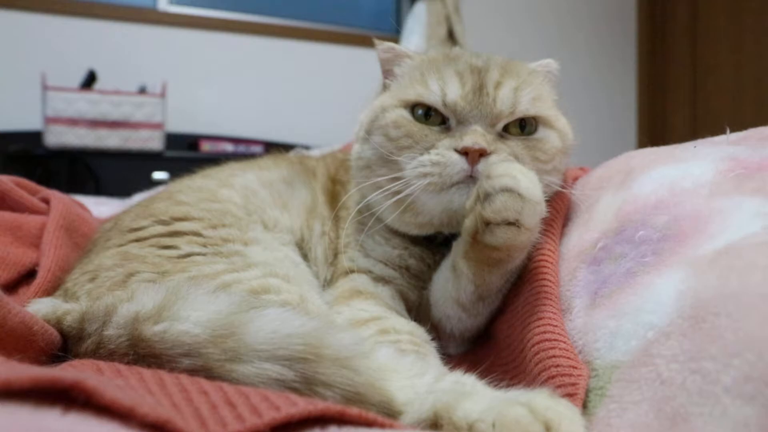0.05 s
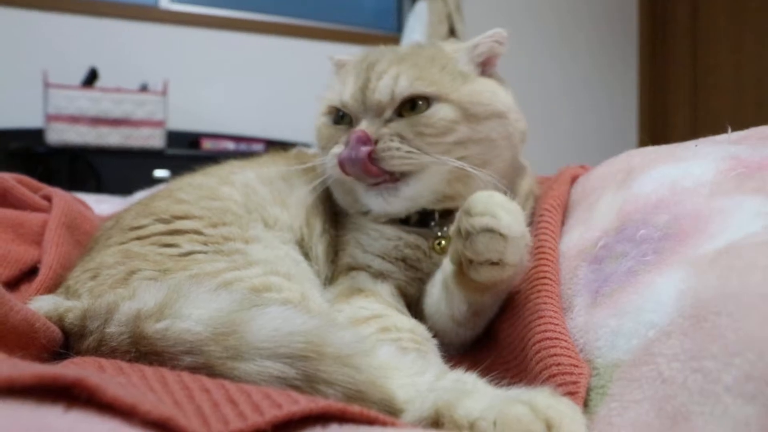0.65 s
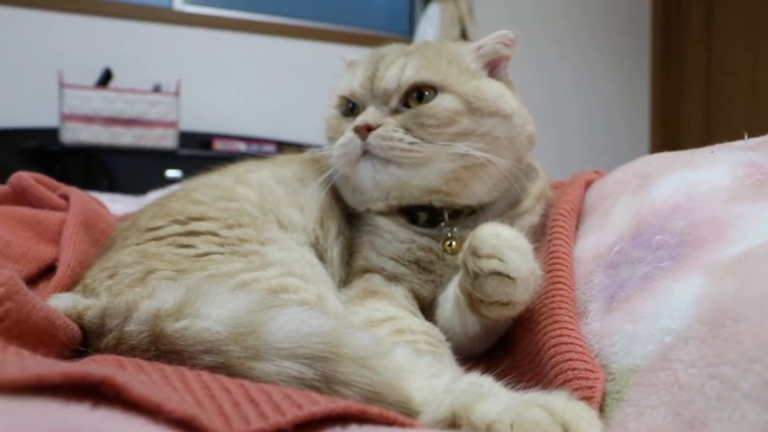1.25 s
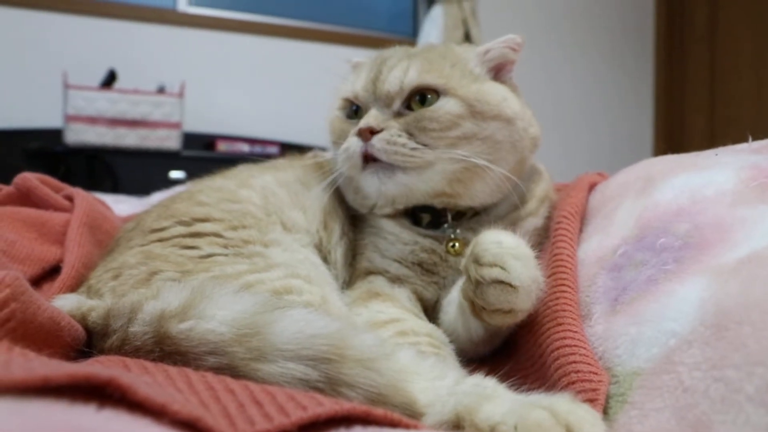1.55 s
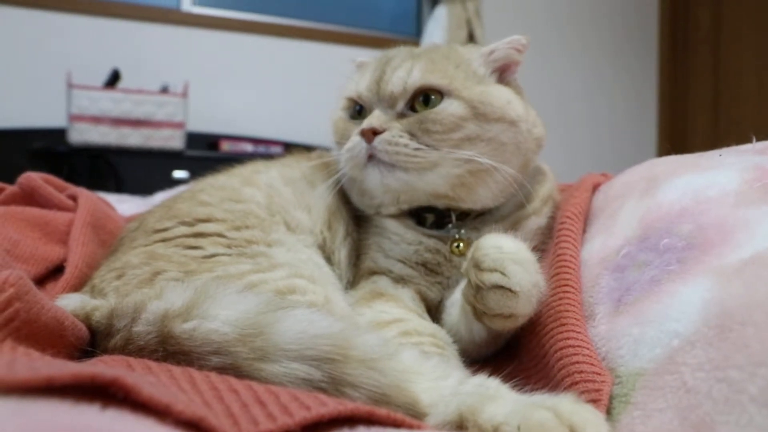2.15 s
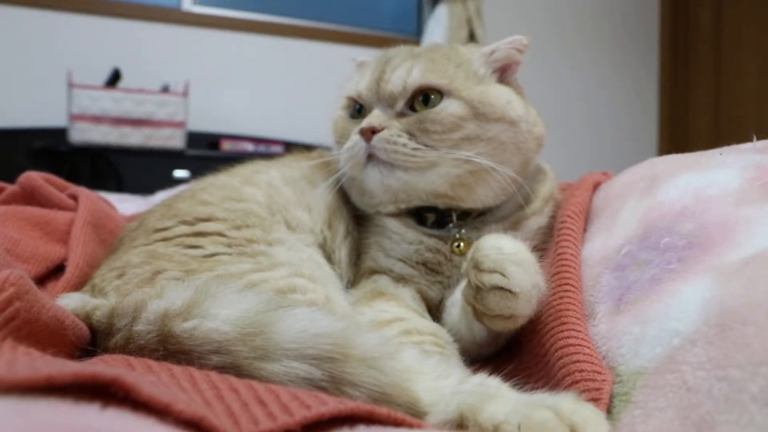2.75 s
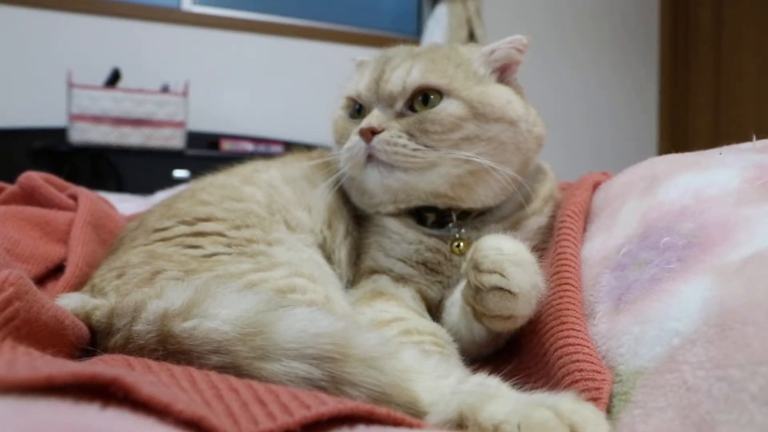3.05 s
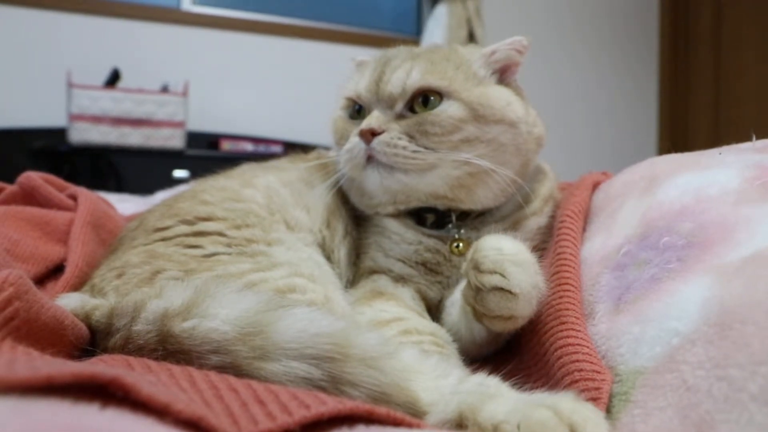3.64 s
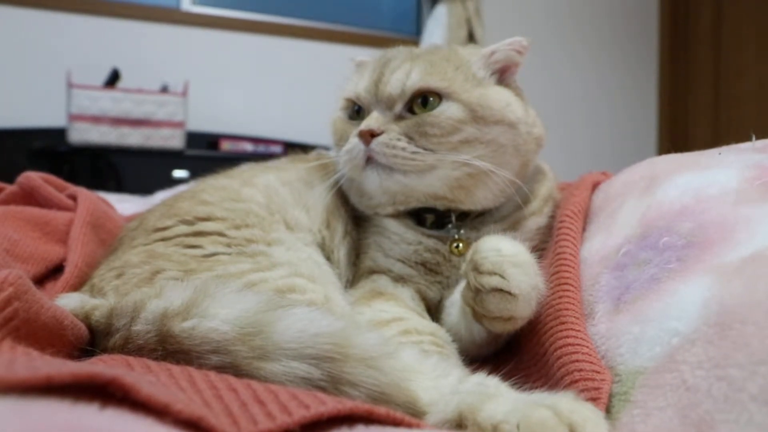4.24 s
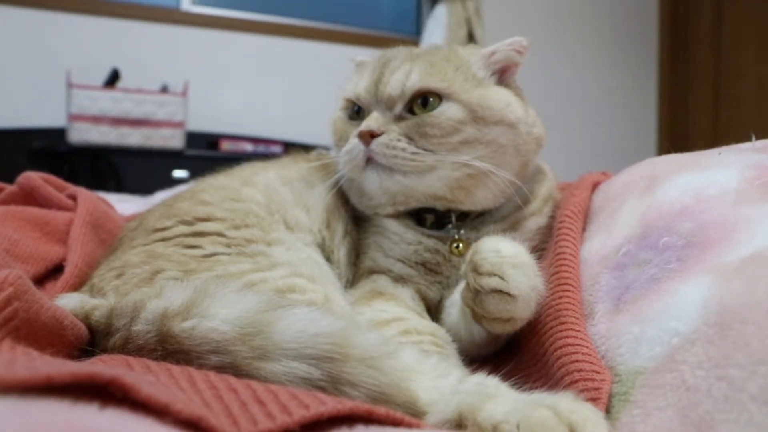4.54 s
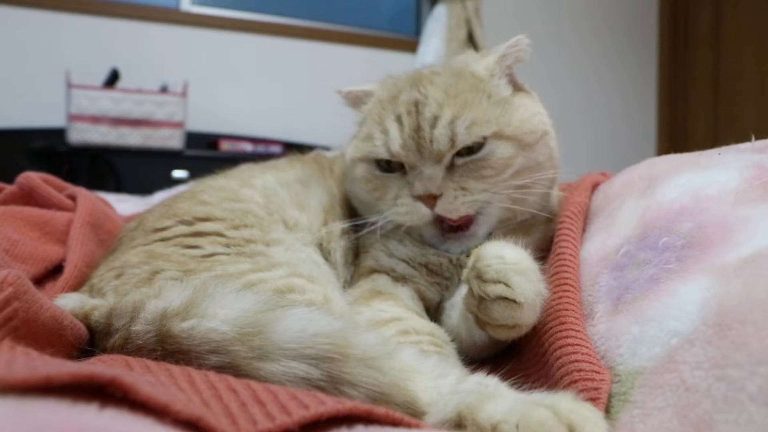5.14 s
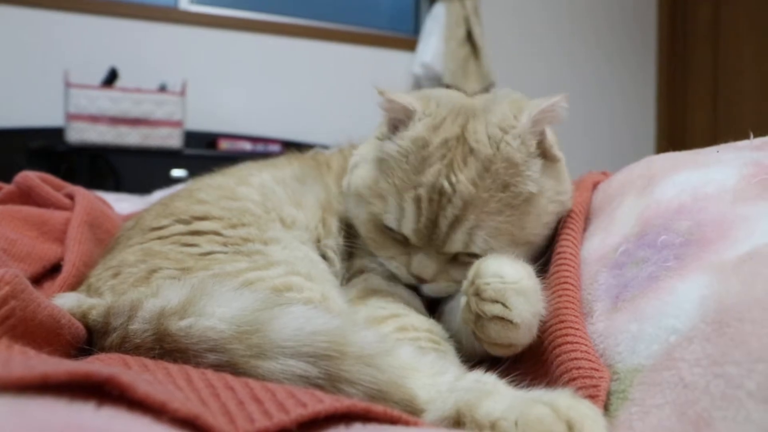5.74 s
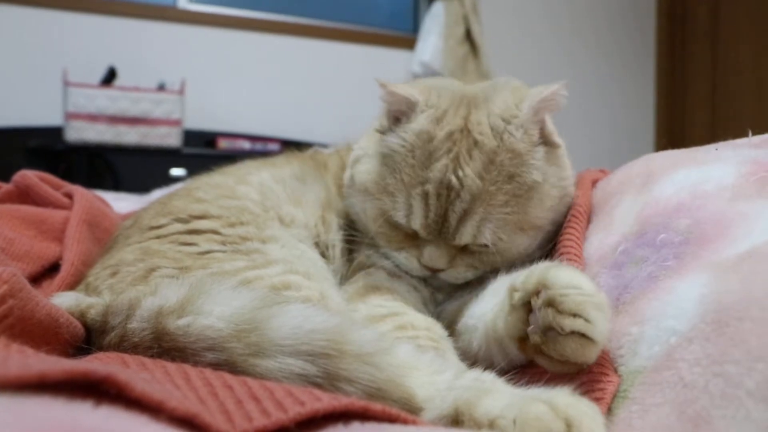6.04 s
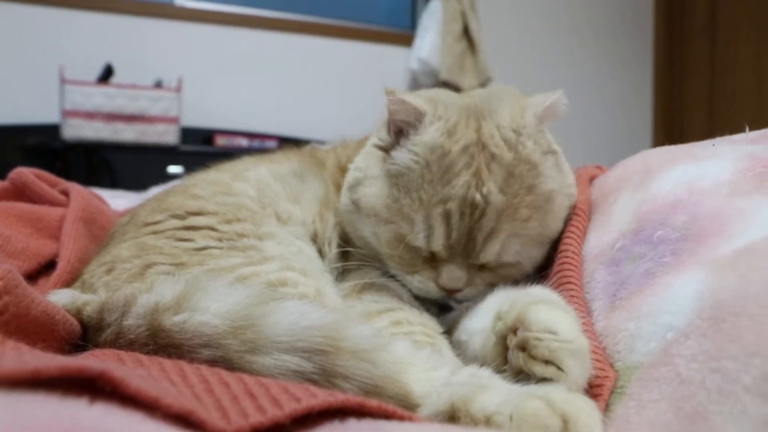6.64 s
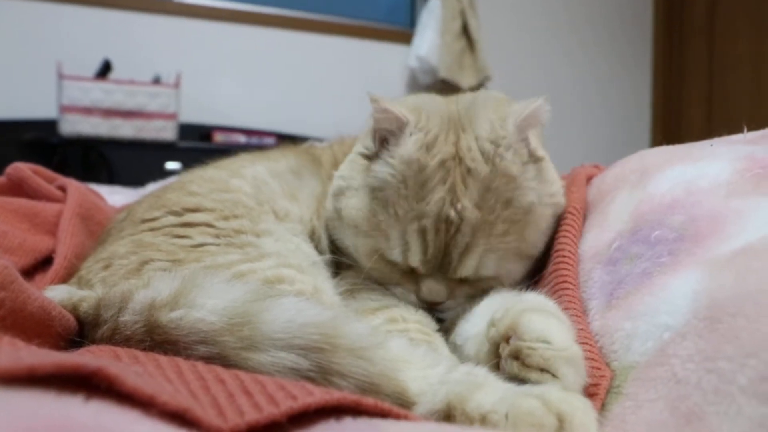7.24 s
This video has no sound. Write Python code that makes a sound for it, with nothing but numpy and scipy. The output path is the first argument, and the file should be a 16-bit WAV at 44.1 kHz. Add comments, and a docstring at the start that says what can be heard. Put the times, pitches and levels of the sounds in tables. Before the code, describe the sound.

A quiet room hums throughout with low, gently pulsing fans that sag slightly in pitch, a soft rush of air, light hiss and a thin, very high whine. Right at the microphone, a camera's focus motor chatters in short bouts of small ticks and scrapes from start to finish. A cat close by makes tiny wet mouth clicks at about 0.6 and 1.1 seconds, then a sharper cluster around 1.6 seconds. Its fur brushes softly on a blanket at about 1.2, 1.8, 3 and 4.5 seconds. Small wet clicks come at 4.7 and 5.3 seconds, the second with one very faint, high ping of a collar bell. Two more clicks follow near 6.1 seconds, then another soft rustle. At about 7.1 seconds the tongue rasps once briefly through fur, with a few wet smacks and a last rustle. Everything stays quiet and close.

```python
"""A cat grooms itself on a blanket in a quiet room, close to a camera with two small microphones.
Saliva snaps in its mouth, fur brushes the blanket, its collar bell rings once and its barbed tongue rasps.
Underneath, two slowly sagging fan rotors hum and beat over mains hum and a soft rush of air.
The camera's focus motor chatters, ringing the lens and body, and its electronics hiss and whine."""
import sys
import numpy as np
from scipy import signal
from scipy.fft import rfft, irfft
from scipy.io import wavfile
from scipy.ndimage import uniform_filter1d

SR = 44100
rng = np.random.default_rng(int(sys.argv[2]) if len(sys.argv) > 2 else 0)


def output_pcm(signal):
    """Save a mono or channel-first signal as 16-bit PCM at the path in sys.argv[1].

    Samples are clipped to [-1, 1] before scaling.
    """
    pcm = np.clip(np.atleast_2d(signal).T, -1, 1) * 32767
    wavfile.write(sys.argv[1], SR, np.round(pcm).astype(np.int16))


N = 321489
TIME = np.arange(N) / SR
FREQ = np.maximum(np.arange(N // 2 + 1) * SR / N, 1)

# Stereo image of the noise layers. Each row: frequency in Hz, correlation between the microphones.
STEREO_LIKENESS = [(30, 0.21), (130, 0.84), (290, 0.69), (640, 0.35), (1400, 0.052), (3000, 0.043),
                   (8000, 0.058)]
# Each rotor's hum. Each row: harmonic number, base level in dB when in step, drift in dB per second.
FAST_HARMONICS = [(1, -67, -2.1), (2, -60, 0.6), (3, -56.5, 0.45), (4, -67, 0.4), (5, -64.5, -0.4),
                  (6, -74, 0)]
SLOW_HARMONICS = [(1, -69, -1.1), (2, -64.5, -0.21), (3, -62, 0.81), (4, -64, 0.24), (6, -71.5, 0.15)]
# Harmonics that swell or sink as the speed sags.
# Each row: harmonic number, start in seconds, length in seconds, gain in dB.
FAST_SWELLS = [(2, 1.57, 3.16, 7.5), (2, 5.33, 0.85, -5)]
SLOW_SWELLS = [(4, 3.32, 1.0, 5.5)]
# Steady motor and mains tones. Each row: pitch in Hz, level in dB.
MAINS_TONES = [(96.2, -72.5), (100, -65.5), (192.3, -78)]
# Colours of moving air and microphone hiss. Each row: frequency in Hz, relative level in dB.
AIR_COLOUR = [(20, -19), (45, -3), (75, -6), (105, -4.5), (150, -0.5), (200, 2), (260, -6), (340, -2.5),
              (550, -9.5), (900, -12.5), (2000, -18), (3500, -22), (6000, -39)]
HISS_COLOUR = [(1000, 1.5), (4800, -4), (6500, 0), (9500, 0.5), (12500, -4), (15500, -9.5)]
# Bouts of focus hunting. Each row: start in seconds, length in seconds, drive in dB.
FOCUS_HUNTS = [(0.144, .24, -59), (0.505, 0.21, -58.5), (0.762, 0.37, -58), (1.2, .37, -62),
               (1.634, .08, -60.5), (1.818, .26, -61.5), (2.134, .08, -59.5), (2.367, 0.11, -59.5),
               (2.507, .27, -59), (2.847, 0.25, -62), (3.355, .15, -63), (3.586, .17, -62.5),
               (4.066, 0.12, -60), (4.277, .12, -65), (4.473, 0.17, -62.5), (5.22, .05, -57.5),
               (5.4, .22, -63), (5.656, 0.22, -60), (6.255, .11, -57.5), (6.408, .16, -61),
               (6.67, 0.26, -61.5), (6.99, 0.34, -61.5)]
# The lens's hardest jerks. Each row: time in seconds, drive in dB.
HARD_JERKS = [(0.102, -46), (0.2414, -45), (0.254, -45), (0.299, -42.5), (0.656, -46), (0.9992, -43),
              (1.0365, -42), (1.9124, -46), (2.16, -45), (2.4456, -48), (2.6005, -45), (2.6764, -47),
              (2.8125, -46), (2.94, -42.5), (3.369, -44.5), (3.4799, -42.5), (3.914, -47.5), (4.3282, -44),
              (4.377, -44), (4.4933, -44), (4.6045, -43.5), (4.717, -47), (5.7957, -46), (5.9864, -46),
              (6.0134, -45), (6.1814, -46), (6.35, -42.5), (6.4575, -44), (6.7707, -43.5), (6.8243, -47)]
# Resonances of lens and camera body, the main set and the bright top set.
# Each row: pitch in Hz, width in Hz, left gain in dB, right gain in dB.
LENS_MODES = [(1163.5, 80.5, -6, 2), (1457, 43, -0.5, -1.5), (1520, 101.5, 2.5, -4), (1656, 41, -2, -7.5),
              (2176, 160, -26, -11), (2730, 72, -14.5, -12), (3433, 124, -16.5, -3.5), (3503, 80, -18, -2)]
LENS_TOP_MODES = [(5290, 330, -22, -14.5), (8030, 280, -35, -12), (8200, 3600, -33, -22)]
# Wet clicks of tongue and teeth. Each row: start in seconds, level in dB, low ring in Hz, high ring
# in Hz, high ring over low in dB, seconds to die by 60 dB, left over right in dB.
MOUTH_CLICKS = [(0.575, -43, 9000, 13000, 2, .008, -3), (1.114, -42, 5600, 6560, -16, 0.014, -4),
                (1.1877, -41, 9500, 12000, 6, .006, -3), (1.5335, -43, 11500, 13500, 0, .004, -3),
                (1.6179, -23.5, 4770, 13200, 12, 0.0026, -7), (1.672, -42, 9000, 10900, 0, .004, -4),
                (1.6735, -33, 9700, 12500, -5, 0.0036, -8), (1.6914, -44, 5800, 10000, -3, .004, -13),
                (1.6934, -33, 5960, 7800, 2, 0.0061, -5), (4.734, -45, 5850, 8900, 2, 0.021, -4),
                (5.34, -46.5, 6200, 7240, -10, 0.023, -9), (6.073, -41, 2280, 2970, 2, 0.011, -5),
                (6.111, -44, 4300, 9000, -3, 0.011, -3), (7.135, -44, 6500, 9580, -2, .008, -9),
                (7.157, -31.5, 2000, 9500, -1, 0.006, -15), (7.1803, -30, 2760, 12200, -4, 0.0047, -15),
                (7.287, -34, 2000, 10500, -12, 0.017, -3)]
# The cat shifts on the blanket. Each row: start in seconds, length in seconds, level in dB.
BODY_SHIFTS = [(1.18, 0.14, -54.5), (1.72, 0.29, -60), (2.95, .65, -61), (4.36, 0.57, -55),
               (6.24, 0.41, -53), (7.05, .4, -57)]
# Colours of brushing fur and rasping tongue. Each row: frequency in Hz, relative level in dB.
FUR_COLOUR = [(80, -26), (180, -4.5), (400, -4.5), (600, -11.5), (1000, -18.5), (2500, -31), (8000, -37)]
TONGUE_COLOUR = [(500, -0.5), (1200, -1), (2200, -3.5), (4500, -18.5), (9000, -12.5), (15000, -22)]


def undb(db):
    """Decibels to gain."""
    return 10 ** (np.asarray(db) / 20)


def over_pitch(points):
    """A curve through the points on a log-frequency axis."""
    hz, value = np.transpose(points)
    return np.interp(np.log(FREQ), np.log(hz), value)


def unit(x):
    """Scale to rms 1."""
    return x / np.sqrt(np.mean(x ** 2))


def pan(db):
    """Stereo gains that put the left side db above the right."""
    return undb(np.array([[db], [-db]]) / 2)


def wander(rate_hz):
    """Smooth random modulation, rms 1."""
    window = int(SR / rate_hz)
    smoothed = uniform_filter1d(rng.standard_normal(N), window, mode="wrap")
    return unit(uniform_filter1d(smoothed, window, mode="wrap"))


def swell(start_s, length_s, fade_s):
    """Rise, hold and fall between 0 and 1; the fades are centred on the two ends."""
    inside_s = np.minimum(TIME - start_s, start_s + length_s - TIME)
    return np.clip(.5 + inside_s / fade_s, 0, 1)


def bouts(table, fade_s, rest_db):
    """An envelope that rises from rest towards each bout's level and falls back."""
    rest = undb(rest_db)
    return rest + sum((undb(db) - rest) * swell(start, length, fade_s) for start, length, db in table)


def diffuse(colour):
    """Coloured stereo noise, rms 1, narrow in the upper bass and wide in the treble."""
    mid, side = rfft(rng.standard_normal((2, N)))
    alike = over_pitch(STEREO_LIKENESS)
    pair = mid * np.sqrt(1 + alike) + np.array([[1], [-1]]) * side * np.sqrt(1 - alike)
    return unit(irfft(pair * undb(over_pitch(colour)), N))


def rotor(hz, harmonics, swells, waver_db, in_step_s=3.033, fade_s=.89):
    """One shaft's hum; the room delays each harmonic differently and the draught makes it waver."""
    turns = np.cumsum(hz) / SR
    turns -= np.interp(in_step_s, TIME, turns)  # both rotors line up at this moment
    hum = 0
    for k, db, drift in harmonics:
        swell_db = sum(gain_db * swell(start, length, fade_s)
                       for number, start, length, gain_db in swells if number == k)
        level_db = db + drift * (TIME - in_step_s) + swell_db + waver_db * wander(2.3)
        hum += np.sqrt(2) * undb(level_db) * np.cos(2 * np.pi * k * turns + k ** 2)
    return hum


def ventilation():
    """The room bed: two fan rotors lose speed and beat ever more slowly over mains hum and rushing air."""
    fast_hz = 58.7 - .18 * TIME - .018 * TIME ** 2
    beat_hz = 2.92 - .04 * TIME
    fast = rotor(fast_hz, FAST_HARMONICS, FAST_SWELLS, waver_db=.47)
    slow = rotor(fast_hz - beat_hz, SLOW_HARMONICS, SLOW_SWELLS, waver_db=.8)
    mains = sum(np.sqrt(2) * undb(db) * np.sin(2 * np.pi * (hz * TIME + rng.random()))
                for hz, db in MAINS_TONES)
    air = diffuse(AIR_COLOUR) * undb(-53.5 + .5 * wander(5.1))
    return (fast + slow + mains + air) * pan(db=.76)


def electronics(whine_hz=15658, left_db=-61.5, right_db=-56.5, offset_rad=2.67):
    """Microphone hiss and a thin whine that reaches the two sides out of step."""
    phase = 2 * np.pi * whine_hz * TIME
    whine = np.array([undb(left_db) * np.sin(phase), undb(right_db) * np.sin(phase + offset_rad)])
    return np.sqrt(2) * whine + diffuse(HISS_COLOUR) * undb(-60.5)


def motor_steps(per_s=105, scatter_db=4, count=4000):
    """The motor's ticks: impulses of uneven spacing and size, rms 1."""
    gaps = (.5 + rng.random(count)) * SR / per_s
    sizes = undb(scatter_db * rng.standard_normal(count))
    at = np.cumsum(gaps).astype(int)
    return unit(np.bincount(at[at < N], sizes[at < N], N))


def light_jerks(per_s=13, over_bout_db=12.5, scatter_db=2.06, count=200):
    """The lens jerks at random while it hunts, harder in a harder bout; rows as in HARD_JERKS."""
    timing, strength = rng.random((count, 2)).T
    times = (np.arange(count) + timing) / per_s
    over_db = over_bout_db + scatter_db * np.sqrt(12) * (strength - .5)
    return [(at_s, bout_db + db) for start, length, bout_db in FOCUS_HUNTS
            for at_s, db in zip(times, over_db) if start < at_s < min(start + length, TIME[-1])]


def camera_body(force, modes, lag_s=.00007):
    """A force rings the camera's modes; the ring reaches the right microphone slightly later."""
    response = 0
    for hz, width_hz, left_db, right_db in modes:
        detuning = (FREQ / hz - hz / FREQ) * hz / (np.pi / 2 * width_hz)
        response += undb([[left_db], [right_db]]) / (1 + 1j * detuning) ** 2  # two-stage band-pass
    lag = np.exp(-2j * np.pi * FREQ * lag_s * np.array([[0], [1]]))
    return irfft(rfft(force) * response * lag, N)


def focus_motor(scrape_s=.0038):
    """The lens hunts in quick small steps over gritty friction; each jerk is a knock amid a scrape."""
    activity = bouts(FOCUS_HUNTS, fade_s=.02, rest_db=-64) * undb(2.1 * wander(41))
    stepping = activity * undb(19.5) * motor_steps()
    friction = activity * undb(17.5 + 2.9 * wander(134)) * rng.standard_normal(N)
    idling = undb(-44.5) * rng.standard_normal(N)
    grit = rng.standard_normal(N)
    knocks, scrape_envelope = np.zeros((2, N))
    for at_s, db in HARD_JERKS + light_jerks():
        knocks[int(at_s * SR)] = undb(db)
        bump = undb(db) / np.cosh(np.clip((TIME - at_s) / scrape_s, -20, 20)) ** 2
        scrape_envelope = np.maximum(scrape_envelope, bump)
    scrapes = scrape_envelope * grit
    # Slow friction mostly shakes the heavy low modes; sharp blows favour the light high ones.
    low_force = stepping + undb(1.5) * friction + idling + undb(34.5) * knocks + undb(7) * scrapes
    mid_force = stepping + friction + undb(37.5) * knocks + undb(12) * scrapes
    top_force = undb(-3.5) * stepping + undb(32) * knocks + undb(14.5) * scrapes
    return (camera_body(low_force, LENS_MODES[:4]) + camera_body(mid_force, LENS_MODES[4:])
            + camera_body(top_force, LENS_TOP_MODES))


def mouth(wet=.58, spread=.43, attack_s=.00032, narrowing_s=.012):
    """A film of saliva snaps: two short rings, each with a spray of crackle; a longer ring is purer."""
    age = np.arange(4096) / SR
    track = np.zeros((2, N + len(age)))
    for start_s, db, low_hz, high_hz, high_db, t60, pan_db in MOUTH_CLICKS:
        spray_q = (1 + t60 / narrowing_s) / (np.pi / 2 * spread)
        rings = 0
        for hz, gain in ((low_hz, 1), (high_hz, undb(high_db))):
            spray = signal.lfilter(*signal.iirpeak(hz, spray_q, fs=SR), rng.standard_normal(len(age)))
            rings += gain * (np.sin(2 * np.pi * hz * age) + wet * unit(spray))
        envelope = (1 - np.exp(-age / attack_s)) * undb(-60 * age / t60)
        click = rings / (1 + undb(high_db)) * envelope
        start = int(start_s * SR)
        track[:, start:start + len(age)] += click * undb(db) * pan(pan_db)
    return track[:, :N]


def fur():
    """Fur brushes the blanket softly, swelling each time the cat shifts."""
    return diffuse(FUR_COLOUR) * bouts(BODY_SHIFTS, fade_s=.17, rest_db=-68.5) * undb(wander(30))


def collar_bell(start_s=5.341, hz=6190, level_db=-69, t60_s=.4):
    """One faint ping from the collar bell, barely touched as the head dips."""
    age = np.maximum(TIME - start_s, 0)
    return np.sin(2 * np.pi * hz * age) * undb(level_db - 60 * age / t60_s) * pan(db=-8)


def tongue(start_s=7.13, lick_s=.062, trail_s=.15, fade_s=.018):
    """The barbed tongue rasps once through the fur, then slides on more lightly."""
    lick = undb(-52.5) * swell(start_s, lick_s, fade_s)
    trail = undb(-56.5) * swell(start_s + lick_s, trail_s, fade_s)
    rasp = diffuse(TONGUE_COLOUR) * undb(3.9 * wander(320))  # fast flutter makes it grainy
    return rasp * (lick + trail) * pan(db=-7.5)


def scene():
    """The mix: room bed, cat and camera."""
    room = ventilation()
    cat = fur() + tongue() + mouth() + collar_bell()
    camera = focus_motor() + electronics()
    return room + cat + camera


def record(dry, open_s=.076, fade_s=.008, top_hz=15900):
    """The sound opens after a moment of near silence; a steep low-pass trims the top."""
    fade_in = np.clip((TIME - open_s) / fade_s, .003, 1)
    low_pass = signal.ellip(10, .1, 70, top_hz, fs=SR, output="sos")
    return signal.sosfilt(low_pass, dry * fade_in)


dry = scene()
out = record(dry)
output_pcm(out)
```